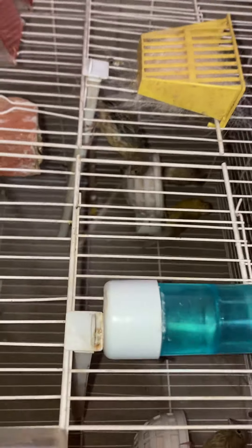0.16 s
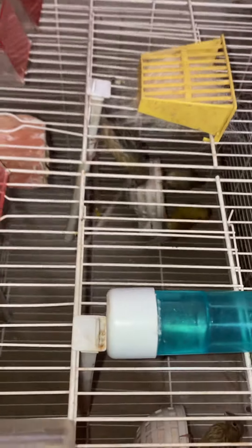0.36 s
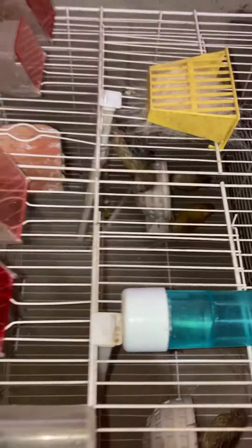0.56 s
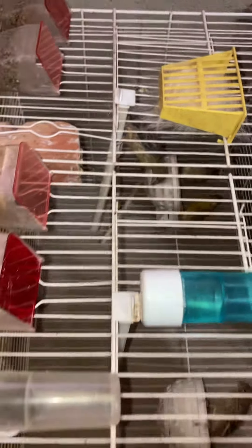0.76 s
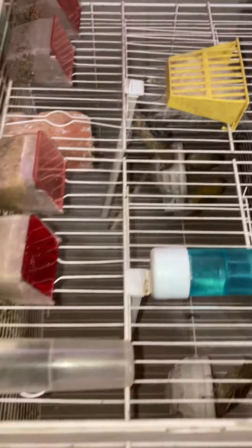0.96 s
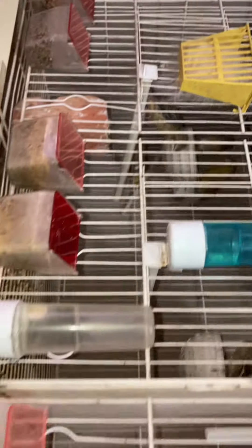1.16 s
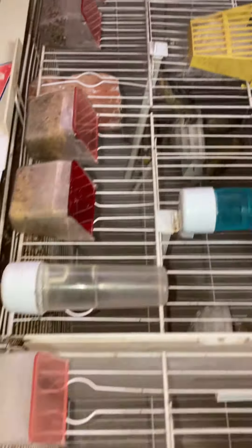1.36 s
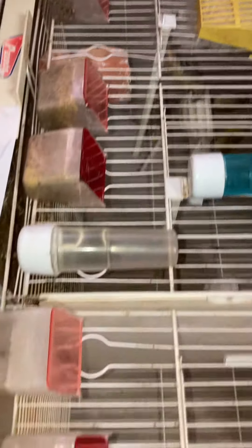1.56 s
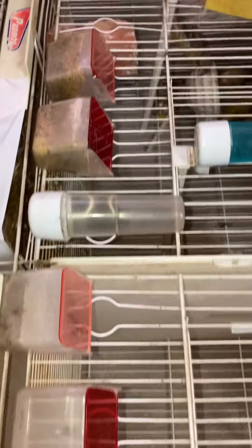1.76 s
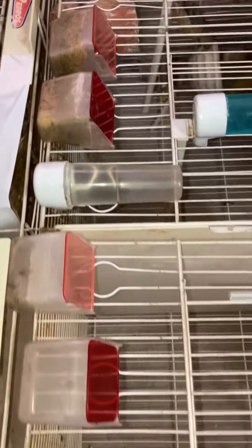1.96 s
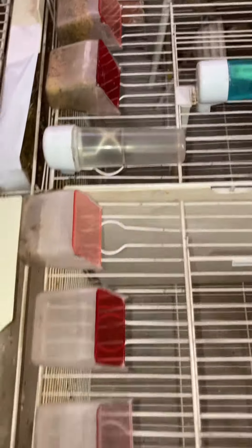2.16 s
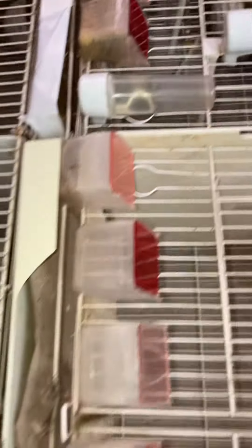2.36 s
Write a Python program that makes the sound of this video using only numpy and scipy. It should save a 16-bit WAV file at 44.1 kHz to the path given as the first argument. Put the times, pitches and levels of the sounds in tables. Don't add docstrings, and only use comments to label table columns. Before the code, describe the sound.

Canaries chirp in a reverberant indoor cage room. Clear short notes sound at 0.2-0.4 s, then three falling chirps from 0.4 s. A rising whistle holds around 0.7-0.9 s, and a pure, higher whistle peaks near 1.1 s. Rapid falling chirps run from 1.25 to 2.15 s over a distant warble. Echoes fade into flutter, perch scrape and rustle near 2.3 s, over low hum and soft handling thuds.

```python
import sys
import numpy as np
from scipy import signal
from scipy.fft import rfft, irfft, next_fast_len
from scipy.io import wavfile
from scipy.ndimage import uniform_filter1d, map_coordinates

SR = 44100
rng = np.random.default_rng(int(sys.argv[2]) if len(sys.argv) > 2 else 0)


def boost_factor(decibels):
    exponent = np.asarray(decibels, float) / 20
    return 10 ** exponent


def generate_wav(sig):
    pcm = np.round(np.clip(np.atleast_2d(sig).T, -1, 1) * 32767).astype(np.int16)
    wavfile.write(sys.argv[1], SR, pcm)


N = 110250
TIME_S = np.arange(N) / SR

# start_s, top_hz, fall_hz, level_db, room_share_db
CHIRPS = [(0.412, 5087, 716, -36.5, 5), (0.541, 4929, 885, -35.5, 7.5), (0.68, 4696, 500, -38.5, 10),
          (1.241, 5475, 682, -43.5, 8), (1.375, 5370, 793, -27, 0), (1.494, 5300, 1150, -35, 4.5),
          (1.622, 5265, 1036, -27.5, -1.5), (1.741, 5010, 784, -29.5, 3), (1.864, 4865, 587, -27.5, -1.5),
          (1.979, 4949, 898, -26.5, 3.5), (2.12, 4815, 775, -29, 0.5)]
# time_s, pitch_hz, level_db
RISING_WHISTLE = [
    (.618, 1435, -60),
    (.64, 2050, -46),
    (.674, 2770, -38),
    (.72, 3081, -37.5),
    (.83, 3125, -36.5),
    (.85, 3088, -30.5),
    (.91, 3180, -74),
    (.93, 2940, -86),
]
RISING_TONES_DB = [-6.5, -12, -20, -21, -32]
# time_s, pitch_hz, level_db
PURE_WHISTLE = [
    (1.045, 3960, -55),
    (1.068, 4060, -46),
    (1.095, 4183, -30),
    (1.125, 4168, -24.5),
    (1.17, 4174, -31.5),
    (1.205, 4173, -36),
    (1.225, 4162, -46),
    (1.28, 4172, -60),
]
PURE_TONES_DB = [1, -26.5, -20.5]
# time_s, pitch_hz, level_db
RUN_IN = [
    (.993, 1694, -54.5),
    (1.003, 2430, -54.5),
    (1.014, 2960, -55),
    (1.032, 3500, -54.5),
    (1.044, 3884, -45.5),
    (1.075, 4100, -42),
    (1.09, 4140, -56),
]
# start_s, length_s, start_hz, held_hz, level_db
NEAR_NOTES = [
    (.212, 0.089, 3600, 3692, -34.5),
    (.27, 0.025, 2980, 3570, -46),
    (.3, .07, 3597, 3721, -34),
    (.315, 0.051, 3660, 3820, -39.5),
]
# start_s, length_s, start_hz, held_hz, level_db
NEIGHBOUR_NOTES = [
    (.76, 0.071, 2742, 2964, -43.5),
    (.795, 0.09, 3346, 3400, -41.5),
    (.875, 0.098, 3328, 3352, -35.5),
]
NOTE_TONES_DB = [1, -29.5, -20, -34]
# start_s, length_s, start_hz, held_hz, level_db
WARBLE = [(.145, 0.045, 2540, 2820, -49.5), (.2, 0.03, 2740, 3170, -48), (.39, 0.048, 2525, 2556, -56.5),
          (1.665, 0.021, 2380, 2200, -51.5), (1.66, 0.023, 3240, 3175, -55.5),
          (1.69, 0.023, 2180, 2080, -42.5), (1.72, 0.019, 2425, 2450, -45), (1.742, 0.025, 2620, 2836, -47),
          (1.775, 0.014, 2800, 2950, -60), (1.9, 0.024, 2435, 2270, -49.5), (1.925, 0.026, 2192, 2070, -40),
          (1.96, 0.034, 2093, 2220, -47), (1.975, 0.023, 2404, 2630, -46.5),
          (2.003, 0.017, 2750, 2910, -50.5), (2.065, 0.02, 2324, 2335, -44),
          (2.085, 0.018, 2590, 2800, -48), (2.1, 0.019, 2900, 3160, -43.5), (2.118, 0.025, 2710, 2630, -55),
          (2.155, 0.022, 3120, 3150, -49), (2.445, 0.04, 2204, 1997, -51.5), (2.478, 0.02, 2640, 2860, -54)]
# pitch_hz, level_db per Hz
BREATH_COLOUR = [(2600, -13.5), (3400, -1.5), (4300, 0), (5600, -4), (6800, -15)]
# centre_s, half_length_s, level_db
SWISHES = [
    (0.626, .02, -58),
    (1.17, 0.04, -45.5),
    (1.385, 0.0096, -51.5),
    (1.771, .008, -61.5),
    (1.863, .007, -64),
    (2.002, 0.009, -61),
    (2.315, 0.024, -46),
]
# pitch_hz, level_db per Hz
SWISH_COLOUR = [(2500, -9), (5500, -2), (9000, 3.5), (12000, -9), (15500, -12)]
# pitch_hz, level_db per Hz
SCRAPE_COLOUR = [(400, -25), (800, 8), (1300, 5), (1900, 0)]
# centre_s, level_db, pitch_hz
BUMPS = [
    (0.305, -40.5, 55.3),
    (1.755, -47, 62),
    (1.932, -46, 70.7),
]
# time_s, level_db
HUM_LEVEL = [(0.0, -52.5), (0.28, -47.5), (0.3, -48.5), (0.38, -51.5), (0.79, -61.5), (0.9, -54),
             (1.1, -55.5), (1.27, -48), (1.68, -58), (1.75, -47), (2.14, -51.5), (2.5, -43.5)]
# pitch_hz, level_db per Hz
HUM_COLOUR = [(18, -46), (33, -29), (55, -0.5), (102, -2), (250, 1.5), (495, -4), (900, -6), (1170, -17),
              (1980, -120)]
# pitch_hz, width_hz, lift_db
HUM_PEAKS = [(66.4, 11, 6.5), (135.6, 11.6, 7.5), (260, 16.5, 1.5)]
# time_s, level_db
RUSTLE_LEVEL = [(0.0, -66), (0.16, -52.5), (0.6, -66), (0.64, -49.5), (0.78, -66), (1.23, -49), (1.38, -62),
                (1.48, -56.5), (1.61, -63.5), (1.71, -56), (1.91, -50), (2.12, -60.5), (2.3, -49),
                (2.31, -44.5), (2.42, -52.5), (2.5, -58.5)]
# pitch_hz, level_db per Hz
RUSTLE_COLOUR = [(500, -23.5), (1300, -5.5), (2500, -9.5), (5000, -14.5), (8000, -15.5), (10500, -15),
                 (12500, -33.5), (15500, -27)]
# pitch_hz, ring_s
ROOM = [(1000, .45), (2500, .4), (4500, .46), (9000, .4), (15000, .35)]
# pitch_hz, share of the difference kept
SIDE_KEPT = [(60, .3), (250, .25), (600, .7), (5500, .95), (7000, .08), (15000, .06)]
# pitch_hz, lead_radians
LEAD = [(600, 0), (2200, -1.36), (6400, -1.66), (8200, 0), (15600, 6.5)]
# pitch_hz, lean_db
LEAN = [(60, 4.5), (180, 2.5), (550, 2), (1650, -0.5), (4970, 1.5), (15000, 0)]


def chirps():
    out = 0
    length_s, peak = 0.051, 0.44
    for start_s, top_hz, fall_hz, level_db, room_db in CHIRPS:
        part = np.clip((TIME_S - start_s) / length_s, 0, 1)
        ramp = np.minimum(part / peak, (1 - part) / (1 - peak))
        gain = boost_factor(level_db) * np.sin(np.pi / 2 * ramp) ** 1.4
        voice = whistle(top_hz - fall_hz * part, gain, [1.5, -17, -14.5], waver_hz=35.14)
        out = out + placed(voice, room_db, pan_db=-2)
    return out


def long_whistles():
    rising = call(RISING_WHISTLE, RISING_TONES_DB, room_db=7, pan_db=-7.5, waver_hz=40, waver_db=3)
    pure = call(PURE_WHISTLE, PURE_TONES_DB, room_db=-10.5, pan_db=7.5, waver_hz=6, waver_db=1)
    run_in = call(RUN_IN, PURE_TONES_DB, room_db=3, pan_db=3, waver_hz=30, waver_db=4)
    return rising + pure + run_in


def breath():
    return boost_factor(-48) * bump_shape(0.663, 0.056) * rush(BREATH_COLOUR, patchy_db=0.0)


def short_notes():
    near = notes(NEAR_NOTES, NOTE_TONES_DB, room_db=-5.5, pan_db=4, waver_hz=15, waver_db=1.5)
    return near + notes(NEIGHBOUR_NOTES, NOTE_TONES_DB, room_db=1, pan_db=4, waver_hz=25)


def far_warble():
    return notes(WARBLE, [0], room_db=3.5, pan_db=0, waver_hz=109)


def swishes():
    gain = sum(boost_factor(level_db) * bump_shape(centre_s, half_s) for centre_s, half_s, level_db in SWISHES)
    return gain * rush(SWISH_COLOUR, patchy_db=0.5)


def scrape():
    rough = boost_factor(-45.5 + 2.9 * wobble(60))
    return rough * bump_shape(2.35, 0.094) * rush(SCRAPE_COLOUR, patchy_db=0.5)


def bumps():
    out = 0
    for centre_s, level_db, pitch_hz in BUMPS:
        thud = np.sin(2 * np.pi * pitch_hz * (TIME_S - centre_s))
        out = out + boost_factor(level_db) * bump_shape(centre_s, 0.016) * thud
    return out


def room_hum():
    level_db = np.interp(TIME_S, *np.transpose(HUM_LEVEL)) + 0.22 * wobble(9.9)
    return boost_factor(level_db) * rush(HUM_COLOUR, patchy_db=0.0, peaks=HUM_PEAKS)


def rustle():
    grain = unit(boost_factor(1 * wobble(300) + 1.2 * wobble(25)))
    level_db = np.interp(TIME_S, *np.transpose(RUSTLE_LEVEL)) + 5
    return boost_factor(level_db) * grain * rush(RUSTLE_COLOUR, patchy_db=3.5)


def call(rows, tones_db, room_db, pan_db, waver_hz, waver_db):
    time_s, pitch_hz, level_db = np.transpose(rows)
    edges = np.clip(np.minimum(TIME_S - time_s[0], time_s[-1] - TIME_S) / 0.0016, 0, 1)
    gain = edges * boost_factor(np.interp(TIME_S, time_s, level_db))
    voice = whistle(np.interp(TIME_S, time_s, pitch_hz), gain, tones_db, waver_hz, waver_db)
    return placed(voice, room_db, pan_db)


def notes(rows, tones_db, room_db, pan_db, waver_hz, waver_db=3):
    out = 0
    glide_s, fade_s = 0.0096, 0.0016
    for start_s, length_s, start_hz, held_hz, level_db in rows:
        age_s = np.clip(TIME_S - start_s, 0, length_s)
        edges = np.minimum(age_s / glide_s / 2, (length_s - age_s) / fade_s)
        pitch_hz = held_hz + (start_hz - held_hz) * np.exp(-age_s / glide_s)
        voice = whistle(pitch_hz, boost_factor(level_db) * np.clip(edges, 0, 1), tones_db, waver_hz, waver_db)
        out = out + placed(voice, room_db, pan_db)
    return out


def whistle(pitch_hz, gain, tones_db, waver_hz, waver_db=3):
    on = np.flatnonzero(gain)
    unsteady_hz = pitch_hz[on] + waver_hz * wobble(121.3, count=len(on))
    phase = 2 * np.pi * np.cumsum(unsteady_hz) / SR
    tones = sum(boost_factor(db) * np.sin((k + 1) * phase) for k, db in enumerate(tones_db))
    out = np.zeros(N)
    out[on] = np.sqrt(2) * gain[on] * boost_factor(waver_db * wobble(70.7, count=len(on))) * tones
    return out


def room_tail():
    hz, t, z = signal.stft(rng.standard_normal((2, int(.7 * SR))), SR, nperseg=256)
    fading = z * boost_factor(-60 * t / along(ROOM, hz)[:, None])
    tail = signal.istft(fading, SR, nperseg=256)[1]
    age_s = np.arange(tail.shape[1]) / SR
    early = boost_factor(-9.5 + 2.5 - 60 * age_s / 0.039)
    tail = tail * np.clip(age_s / 0.002 - 1, 0, 1) * (1 + early)
    return tail / np.linalg.norm(tail) * np.sqrt(2)


def placed(x, room_db, pan_db):
    first, last = np.flatnonzero(x)[[0, -1]]
    voice = x[first:last]
    echoes = signal.fftconvolve(voice[None], room_tail(), axes=1)[:, :N - first]
    straight = signal.lfilter(*signal.butter(2, 7500, fs=SR), voice)
    out = np.zeros((2, N))
    out[:, first:last] = straight * boost_factor([[pan_db / 2], [-pan_db / 2]])
    out[:, first:first + echoes.shape[1]] += boost_factor(room_db) * echoes
    return out


def rush(colour, patchy_db, peaks=()):
    noise = patches(rng.standard_normal((2, N)), 512, tall=8, wide=10, depth_db=patchy_db)
    noise = patches(noise, 2048, tall=2, wide=3, depth_db=2.5)
    m = next_fast_len(N + 8192)
    hz = np.fft.rfftfreq(m, 1 / SR)
    closed = [(colour[0][0] * .6, -60), *colour, (colour[-1][0] * 1.5, -60)]
    lift_db = sum(db * np.exp(-((hz - centre) / width) ** 2) for centre, width, db in peaks)
    return unit(irfft(rfft(noise, m) * boost_factor(along(closed, hz) + lift_db), m)[:, :N])


def patches(pair, size, tall, wide, depth_db):
    z = signal.stft(pair, nperseg=size)[2]
    field = uniform_filter1d(rng.standard_normal(z.shape[1:]), size=tall, axis=0)
    field = uniform_filter1d(field, size=wide, axis=1)
    return signal.istft(z * boost_factor(depth_db * unit(field)), nperseg=size)[1][:, :N]


def bump_shape(centre_s, half_s):
    return np.exp(-((TIME_S - centre_s) / half_s) ** 2)


def wobble(rate, count=N):
    steps = np.arange(count) * np.clip(rate, .1, 1500) / SR
    return map_coordinates(rng.standard_normal(4000), [steps])


def unit(x):
    return x / np.sqrt(np.mean(x ** 2) + 1e-20)


def along(points, hz):
    f, value = np.transpose(points)
    return np.interp(np.log(hz + 1), np.log(f + 1), value)


def scene():
    birds = chirps() + long_whistles() + breath() + short_notes() + far_warble()
    return birds + swishes() + scrape() + bumps() + room_hum() + rustle()


def ports(pair):
    m = next_fast_len(N + 8192)
    hz = np.fft.rfftfreq(m, 1 / SR)
    left, right = rfft(pair, m) * (hz < 15850)
    mid = (left + right) / 2
    side = (left - right) / 2 * np.clip(along(SIDE_KEPT, hz), 0, 1)
    tilt = boost_factor(along(LEAN, hz) / 2) * np.exp(.5j * np.interp(hz, *np.transpose(LEAD)))
    return irfft(np.array([(mid + side) * tilt, (mid - side) / tilt]), m)[:, :N]


def gate(pair):
    ms = np.array([pair[0] + pair[1], pair[0] - pair[1]]) / 2
    z = signal.stft(ms, nperseg=2048)[2]
    power = (abs(z[:, :1024]) ** 2).reshape(2, 64, 16, -1).mean(2)
    level_db = 10 * np.log10(power + 1e-20)
    top = level_db.max(0)
    spread = [np.roll(top, k, axis=0) - 2.5 * abs(k) for k in range(-1, 7)]
    hidden = np.max(spread, axis=0) - 24
    usual = np.percentile(top, 30, axis=1, keepdims=True) - 7 * np.linspace(2.2, -.3, 64)[:, None]
    bass = (np.arange(64) < 7)[:, None]
    keep = (level_db > np.maximum(hidden, usual)) | bass
    z[:, :1024] *= np.repeat(keep, 16, axis=1)
    mid, side = signal.istft(z, nperseg=2048)[1][:, :N]
    return np.array([mid + side, mid - side])


def roll_off(x):
    return signal.sosfilt(signal.butter(12, 15870, fs=SR, output="sos"), x)


def record(dry):
    mix = gate(ports(dry))
    return roll_off(mix)


dry = scene()
out = record(dry)
generate_wav(out)
```